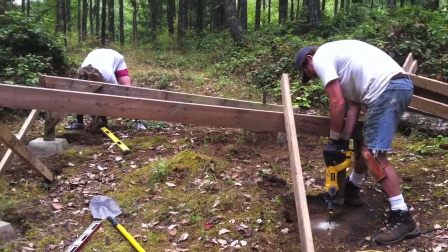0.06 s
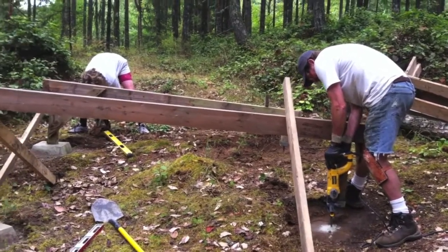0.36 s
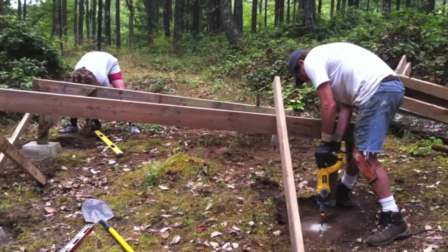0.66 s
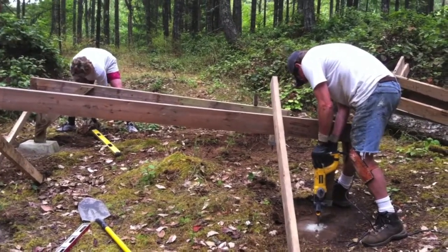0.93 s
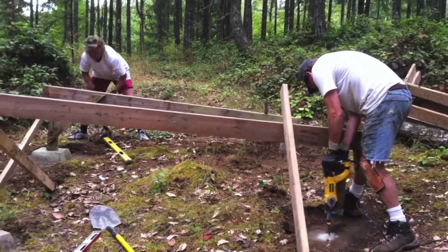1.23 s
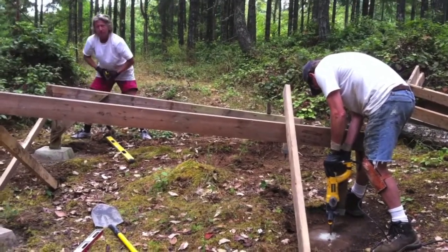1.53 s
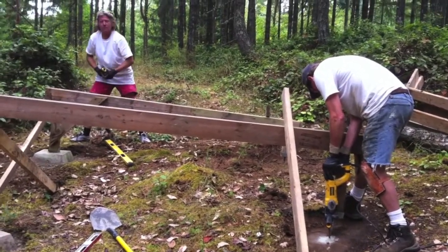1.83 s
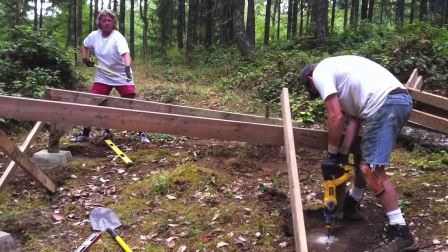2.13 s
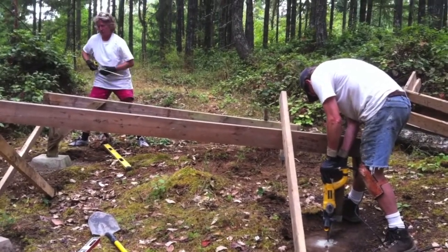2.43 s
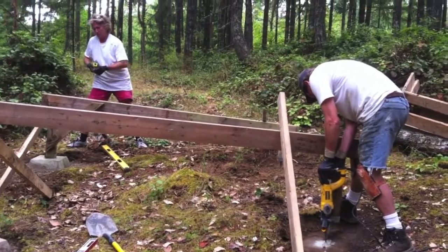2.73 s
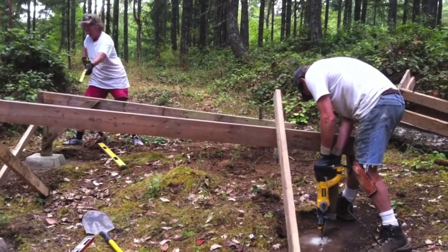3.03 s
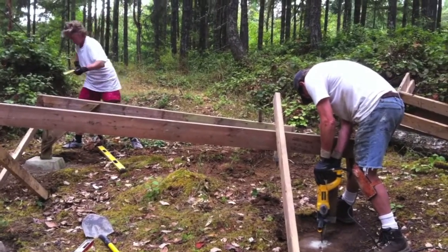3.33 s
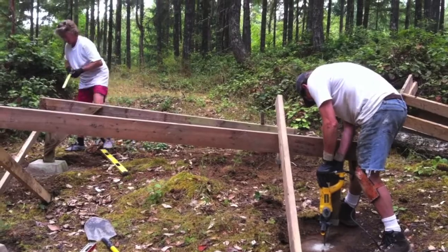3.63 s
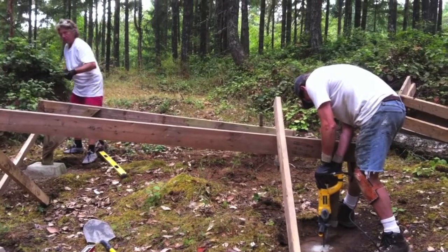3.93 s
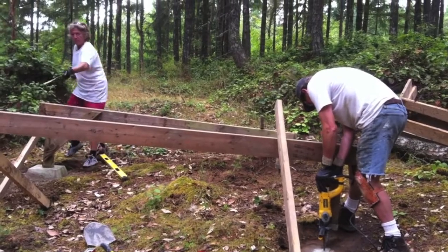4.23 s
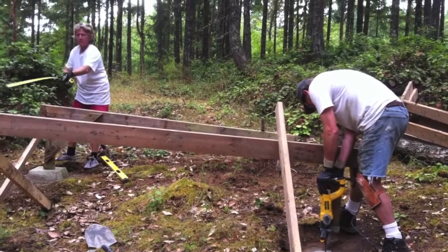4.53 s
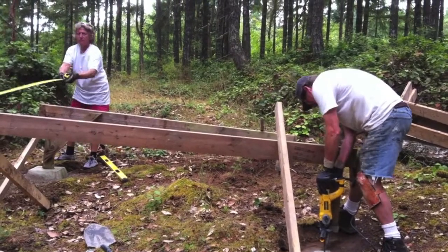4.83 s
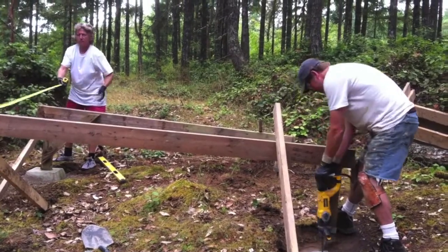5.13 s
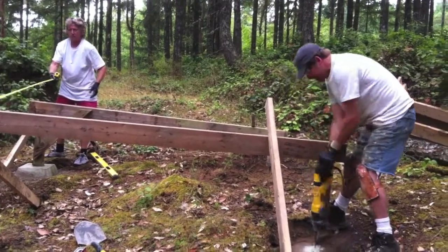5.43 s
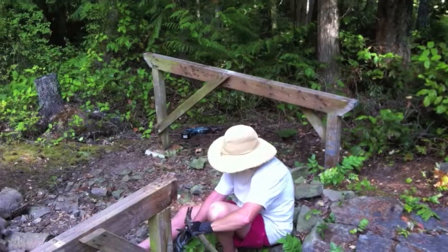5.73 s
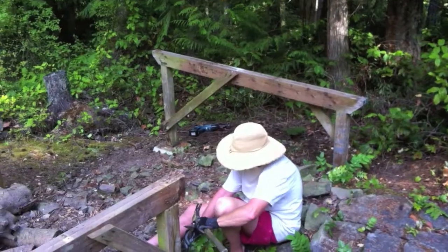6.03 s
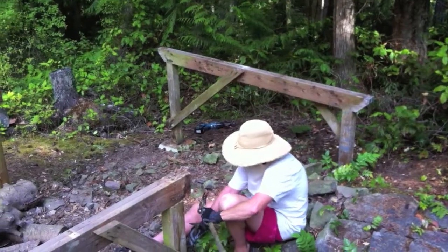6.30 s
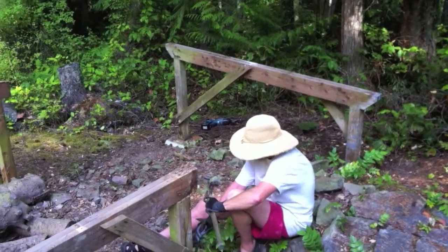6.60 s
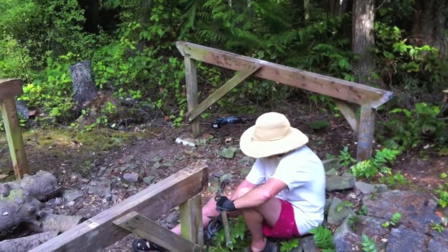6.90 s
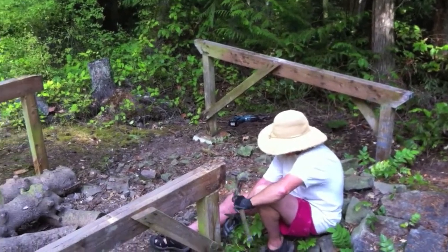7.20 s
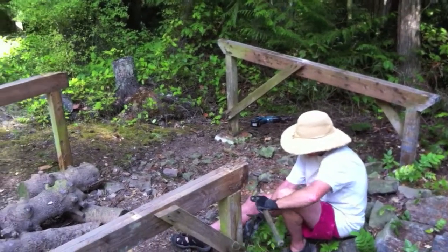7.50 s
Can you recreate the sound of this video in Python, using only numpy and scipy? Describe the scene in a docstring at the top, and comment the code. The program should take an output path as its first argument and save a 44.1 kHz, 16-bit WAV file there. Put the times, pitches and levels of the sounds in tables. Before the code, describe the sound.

Steady hammering and grinding of a drill in stone stops, followed by six louder, ringing hammer blows on a chisel.

```python
"""A cordless rotary hammer bores into bedrock in a forest clearing: periodic impacts excite its bit and
casing over whirring gears and grinding rock. It runs down and is pulled out, the bit scraping and
clacking in the hole. Then, at another spot, small stones shift and a hand hammer strikes a steel chisel
six times. Each blow excites damped modes of steel and rock, and the trees scatter the sound back."""
import sys
import numpy as np
from scipy import signal
from scipy.fft import rfft, irfft, next_fast_len
from scipy.io import wavfile
from scipy.ndimage import map_coordinates

SR = 44100
rng = np.random.default_rng(int(sys.argv[2]) if len(sys.argv) > 2 else 0)


def int16_out(signal):
    """Quantize to a 16-bit WAV file."""
    q = np.round(np.clip(np.atleast_2d(signal).T, -1, 1) * 32767)
    wavfile.write(sys.argv[1], SR, q.astype(np.int16))


N = 342216
T = np.arange(N) / SR
CHANGE_S, CHANGE_FADE_S = 5.603, 0.04  # the first scene has faded out and the second fades in


def amp(db):
    """Decibels to amplitude ratio."""
    return 10 ** (np.asarray(db) / 20)

def unit(x):
    """Normalisation to rms 1."""
    return x / np.sqrt(np.mean(x ** 2) + 1e-20)

def along(points, hz):
    """Interpolation on a logarithmic frequency axis."""
    f, v = np.transpose(points)
    return np.interp(np.log(hz + 1), np.log(f + 1), v)

def wobble(rate):
    """Smooth random modulation, rate knots a second."""
    return map_coordinates(rng.standard_normal(int(N * rate / SR) + 4), [T * rate])

def noise(spectrum, size=N):
    """Spectrally shaped noise of rms 1."""
    m = next_fast_len(size)
    gain = amp(along(spectrum, np.fft.rfftfreq(m, 1 / SR)))
    return unit(irfft(rfft(rng.standard_normal(m)) * gain, m)[:size])

def until(end, fade):
    """A linear fade from 1 that reaches 0 at the end."""
    return np.clip((end - T) / fade, 0, 1)

def add(track, s, sound):
    """Superposition of a sound at s seconds."""
    part = track[round(s * SR):][:len(sound)]
    part += sound[:len(part)]

def ring(modes, t, scatter_db):
    """Free vibration: damped modes of random phase and scattered strength."""
    return sum(amp(db + scatter_db * rng.normal() - 60 * t / t60)
               * np.sin(2 * np.pi * (hz * t + rng.random())) for hz, db, t60 in modes)

def burst(t, rise, hold, t60):
    """An envelope of linear rise, hold and exponential decay."""
    return np.clip(t / rise, 0, 1) * amp(-60 * np.maximum(t - hold, 0) / t60)


# Each row: frequency in Hz, relative spectral density in dB.
AIR_SPECTRUM = [(18, -24.5), (30, -9), (64, -20), (215, -2), (364, -11.5), (415, -7.5), (937, -9.5),
                (1220, -10), (1540, -15), (2230, -14.5), (3870, -19), (11700, -22.5), (16000, -26)]
def still_air():
    """Ambient noise: a faint, wavering floor under the second scene."""
    fade_in = 1 - until(CHANGE_S + CHANGE_FADE_S, CHANGE_FADE_S)
    return amp(-66 + 0.64 * wobble(12)) * noise(AIR_SPECTRUM) * fade_in


# Each row: frequency in Hz, reverberation time in seconds.
ECHO_T60 = [(200, 0.1), (1200, 0.83), (4000, 0.66), (5900, 0.77), (8500, 0.52), (14000, 0.28)]
# Each row: frequency in Hz, relative level of the echo in dB.
ECHO_COLOUR = [(150, 20.5), (700, -1.5), (1200, -8.5), (2500, -2.5), (6000, -2), (8500, -1), (11000, 0),
               (15000, -2.5)]
def forest(x):
    """Scattering: near trunks answer densely at once, far ones ever more faintly."""
    hz, t, z = signal.stft(rng.standard_normal(SR), SR, nperseg=256)
    decay = amp(along(ECHO_COLOUR, hz)[:, None] - 60 * t / along(ECHO_T60, hz)[:, None])
    onset = np.clip(t / 0.014, 0, 1) * (1 + 4 * np.exp(-t / 0.015))
    tail = signal.istft(z * decay * onset, SR, nperseg=256)[1]
    return signal.fftconvolve(x, tail / np.linalg.norm(tail))[:N]


# Hard contact, of stones or of steel. Each row: frequency in Hz, relative density in dB.
CRACK_SPECTRUM = [(1180, -31.5), (2000, -4.5), (2200, -17), (3230, -4), (3650, -12), (4410, -6.5),
                  (4820, -11), (5930, -7.5), (6940, -12), (7700, -8.5), (8400, -0.5), (11000, -14),
                  (12300, -16), (13300, -7.5), (16000, -25)]
# Each row: start in seconds, relative level in dB, pitch in Hz.
STONE_CLICKS = [(5.6274, -50, 3130), (5.644, -44.5, 1870), (5.667, -40.5, 1590), (5.69, -41, 1570),
                (5.709, -41, 8400), (5.8433, -48, 3960)]
def stones():
    """Collision: stones shift under the chisel, each with a click and a brief rough note."""
    out, t = np.zeros(N), np.arange(SR // 10) / SR
    for s, db, hz in STONE_CLICKS:
        envelope = burst(t, 0.0007, 0.00096, 0.014) + 0.26 * burst(t, 0.0027, 0.0069, 0.17)
        click = noise(CRACK_SPECTRUM, len(t)) * envelope
        band = [(hz / 2, -27), (hz, 0), (hz * 1.001, -4.5), (hz * 2, -27)]
        note = noise(band, len(t)) * burst(t, 0.0011, 0.001, 0.053)
        add(out, s, amp(db - 11.5) * (click + note))
    return out


# Modes of hammer head and chisel. Each row: frequency in Hz, relative level in dB, T60 in seconds.
STEEL_MODES = [(1344, -3, 0.14), (2730, -0.5, 0.088), (3352, -4.5, 0.066), (4470, 6, 0.11),
               (5805, -6.5, 0.35), (6030, -3, 0.28), (8000, 3, .08), (8300, -12, .09), (8100, -14, .08)]
# Modes of the rock. Each row: frequency in Hz, relative level in dB, T60 in seconds.
ROCK_MODES = [(279, -16, 0.139), (339, -13.5, 0.12), (437, -10, 0.0911), (532, -6, 0.083), (580, -3, 0.047),
              (745, -3.5, 0.11), (850, -10, 0.12), (990, -17.5, .08)]
# Crushing rock. Each row: frequency in Hz, relative density in dB.
THUD_SPECTRUM = [(40, -29.5), (120, -29), (290, -7), (450, -13.5), (780, 1), (1020, 1), (1300, -2),
                 (1650, 0), (1850, -22), (2400, -12.5), (5000, -55.5)]
# Each row: time in seconds, gain in dB, knock pitch in Hz, then knock, thud and crack gains in dB.
CHISEL_BLOWS = [(5.897, -4, 1212, -10, -14, -13), (6.193, -1.5, 1223, -16, -16, -14),
                (6.469, -1.5, 1180, -15.5, -16, -14), (6.786, -3, 1195, -15.5, -14.5, -11.5),
                (7.102, -1.5, 1601, -16, -15, -13.5), (7.403, -2, 1640, -13, -13.5, -12.5)]
def hammer_and_chisel():
    """Impact excitation: steel cracks on steel, the rock thuds and the tools ring on."""
    out, t = np.zeros(N), np.arange(SR * 3 // 4) / SR
    ring_db, loss_db = -27, 1.4  # with each blow the chisel bites deeper and rings less
    crack_shape = burst(t, 0.0016, 0.0068, 0.025) + 0.1055 * burst(t, 0.0093, 0.012, 0.091)
    crush_shape = burst(t, 0.0065, 0.0086, 0.038) + 0.1 * burst(t, 0.012, 0.015, 0.175)
    seating = amp(-25 * np.clip(1 - t / 0.002214, 0, 1))  # contact force builds as the chisel seats
    for struck, (s, db, knock_hz, knock_db, thud_db, crack_db) in enumerate(CHISEL_BLOWS):
        crack = amp(crack_db) * noise(CRACK_SPECTRUM, len(t)) * crack_shape
        crush = noise(THUD_SPECTRUM, len(t)) * crush_shape
        rock = ring(ROCK_MODES, t, scatter_db=0.5) * np.clip(t / 0.004, 0, 1)
        thud = amp(thud_db - 1.4) * (crush + 0.5 * rock)
        knock = amp(knock_db + 2) * np.sin(2 * np.pi * knock_hz * t) * burst(t, 0.0043, 0.0045, 0.052)
        steel = amp(ring_db - loss_db * struck) * ring(STEEL_MODES, t, scatter_db=2)
        add(out, s - 0.0015, amp(db) * seating * (crack + thud + knock + steel))
    return out


# Tugs on the bit. Each row: start in seconds, length in seconds, level in dB.
BIT_TUGS = [(5.219, 0.02, -46.5), (5.275, 0.049, -44), (5.404, 0.032, -37.5), (5.442, 0.077, -40.5),
            (5.529, 0.037, -53)]
# Each row: start in seconds, level in dB.
SOIL_SPILLS = [(5.311, -50), (5.37, -55), (5.41, -60)]
# Scraped rock and falling soil. Each row: frequency in Hz, relative density in dB.
SCRAPE_SPECTRUM = [(300, -41), (680, -6), (850, -13), (1450, -1.5), (1850, -2), (2200, 1.5), (2700, -6),
                   (3500, -9), (4400, -8), (6500, -4.5), (8100, -15.5), (11700, -2), (13300, -22),
                   (15200, -8), (16400, -34)]
SOIL_SPECTRUM = [(40, -26), (90, -17), (150, 2), (300, -7), (450, -8), (750, 1), (1100, -3), (2000, -52)]
def withdrawal():
    """Sliding friction: the flutes scrape up the gritty wall, and loose soil drops back."""
    sag_db_per_s = 45
    tugs = sum(amp(db - sag_db_per_s * np.maximum(T - s, 0)) * burst(T - s, 0.011, length, 0.083)
               for s, length, db in BIT_TUGS)
    spills = sum(amp(db) * burst(T - s, 0.0077, 0.0077, 0.31) for s, db in SOIL_SPILLS)
    grain = unit(amp(2.3 * wobble(520) + 1.7 * wobble(120)))
    scrape = tugs * grain * noise(SCRAPE_SPECTRUM)
    return (scrape + spills * noise(SOIL_SPECTRUM)) * until(CHANGE_S, CHANGE_FADE_S)


# Each row: start in seconds, relative level in dB.
RIM_CLACKS = [(5.3194, -32.5), (5.352, -22), (5.388, -21.5), (5.4108, -23)]
# Each row: frequency in Hz, relative density in dB.
CLACK_SPECTRUM = [(150, -45), (600, -20.5), (2100, -11.5), (3900, -20.5), (5000, -6), (5900, -4),
                  (7100, -14), (8700, -13), (9400, -11), (10600, -2.5), (12600, -22), (16000, -14.5),
                  (16500, -54.5)]
def clacks():
    """Brief contact, broad spectrum: the bit knocks on the rim of the hole on its way out."""
    out, t = np.zeros(N), np.arange(SR // 16) / SR
    envelope = burst(t, 0.00045, 0.00081, 0.017) + 0.095 * burst(t, 0.00126, 0.0022, 0.057)
    for s, db in RIM_CLACKS:
        add(out, s, amp(db - 5.5) * noise(CLACK_SPECTRUM, len(t)) * envelope)
    return out


USUAL_BITE_DB, STRIKE_HZ = -38.5, 57.68  # the usual load and the strike rate under it
RELEASE_S, STRIKER_STOP_S = 4.92, 5.16  # trigger let go; motor too slow to throw the striker
# The bite builds, then slips as the rock gives way. Each row: time in seconds, level in dB.
BITE_LEVELS = [(0.0, -39), (0.72, -36), (1.22, -36), (1.24, -39), (2.21, -37), (2.24, -42), (2.28, -41),
               (2.87, -38), (2.96, -40), (3.41, -38), (4.66, -39), (4.88, -40)]
def bite():
    """Mechanical load: how hard the bit bites, in dB at each sample."""
    return np.interp(T, *np.transpose(BITE_LEVELS))

def motor():
    """Load slows a motor; once released, it coasts down and fades."""
    sag_hz_per_db, coast_hz_per_s, coast_db_per_s, idle_db = 0.5, 32, 22, -5
    coasting = np.maximum(T - RELEASE_S, 0)
    striking = until(STRIKER_STOP_S, 0.023)
    rate = STRIKE_HZ - sag_hz_per_db * (bite() - USUAL_BITE_DB) - coast_hz_per_s * coasting
    level_db = bite() - coast_db_per_s * coasting + idle_db * (1 - striking)
    return level_db, np.maximum(rate, 1), striking


# Each row: frequency in Hz, relative density in dB.
GROUND_SPECTRUM = [(30, -27), (80, -15), (130, -4), (200, 0), (230, -3.5), (290, -9), (400, 2), (480, -1.5),
                   (600, -31), (1000, -78)]
def ground_rumble():
    """Forced vibration: the ground rumbles more as the bite hardens."""
    return amp(-74.5 + 0.61 * (bite() - USUAL_BITE_DB) + 3.2 * wobble(7.2)) * noise(GROUND_SPECTRUM)


def chips():
    """Damped oscillation: rock chips catch between bit and hole and clink."""
    out, t = np.zeros(N), np.arange(SR // 16) / SR
    level_db = motor()[0]
    for when, pitch, size in rng.random((70, 3)):
        s = 5.1 * when
        clink = np.sin(2 * np.pi * 1100 * 2.6 ** pitch * t) * burst(t, 0.0027, 0.0051, 0.058)
        add(out, s, amp(level_db[round(s * SR)] - 6 + 7.1 * size ** 2) * clink)
    return out


# Each row: frequency in Hz, relative density in dB.
TICK_SPECTRUM = [(100, -56), (500, -12), (2500, -21.5), (5500, -9), (8000, -18), (10500, 2.5), (12400, 3),
                 (13200, -1.5), (14500, 2.5), (15900, -3.5), (16400, -43)]
def striker_ticks(blow, since, scatter):
    """Impact and rebound: the bit bounces, so strong and weak blows tend to alternate."""
    force = amp(2.2 * np.tanh(scatter) + 1.2 * (-1) ** blow)
    envelope = burst(since, 0.00025, 0.0011, 0.0029) + 0.13 * burst(since, 0.001, 0.001, 0.055)
    seated_s = 1.75  # ticks are weaker until the bit has seated
    return amp(-43 - 6.5 * until(seated_s, seated_s)) * unit(force * envelope) * noise(TICK_SPECTRUM)


# The bit in a shallow and in a deep hole. Each row: frequency in Hz, relative density in dB.
SHALLOW_SPECTRUM = [(1760, -20), (3000, -4.5), (3330, -8), (3890, 4), (4410, 0.5), (5000, 5), (5840, 0.5),
                    (6300, 5), (7460, -11), (8700, 2), (9460, -3.5), (10400, 0.5), (13100, -13), (15100, 2),
                    (16000, -8)]
DEEP_SPECTRUM = [(1760, -41), (3000, -4), (3450, -8.5), (3910, 1), (4470, -2.5), (4930, 2.5), (5800, 1),
                 (6300, 4.5), (8000, -11), (10100, 0.5), (10800, 1), (12200, -3.5), (13300, -25),
                 (15100, 1), (16000, -9)]
def grinding(drive):
    """Abrasion excites the resonances of the bit, which change as it sinks."""
    depth = np.clip((T - 1.2) / 1.83, 0, 1)
    grit = np.sqrt(1 - depth) * noise(SHALLOW_SPECTRUM) + np.sqrt(depth) * noise(DEEP_SPECTRUM)
    return grit * unit(np.sqrt(drive) * amp(2.57 * wobble(900)))


# Each row: multiple of the strike rate, relative level in dB.
GEAR_ORDERS = [(3, -39.5), (4, -33.5), (8, -33.5), (9, -34), (11, -18.5), (12, -23), (20, -18.5), (24, -11),
               (28, -7.5), (36, -12)]
def gear_whine(turns):
    """Periodic tooth contact gives harmonics of the crank rate."""
    tones = sum(amp(db + 1.95 * wobble(9)) * np.sin(2 * np.pi * order * turns + 0.76 * wobble(30))
                for order, db in GEAR_ORDERS)
    return tones * until(STRIKER_STOP_S, 0.15)


def recoil_drive(since, scatter, striking):
    """Amplitude modulation: the housing answers 3 ms after each blow, then the piston returns."""
    impact = 0.38 * burst(since, 0.00048, 0.0016, 0.028)
    housing = burst(since - 0.0028, 0.00033, 0.0011, 0.021)
    piston = 0.5 * burst(since - 0.0088, 0.00048, 0.0016, 0.053)
    recoil = unit((impact + housing + piston) * amp(1.4 * scatter))
    in_step = 0.21 * striking + 0.14 * (1 - striking)  # share of the power that follows the crank
    return np.sqrt(1 - in_step + in_step * recoil ** 2)


# The gearbox casing. Each row: frequency in Hz, relative density in dB.
CASING_SPECTRUM = [(80, -62), (400, -37), (585, -18), (650, -4), (720, -6), (790, -15.5), (960, -11),
                   (1100, -1.5), (1650, -0.5), (2130, -0.5), (2400, -4), (2850, -3.5), (3400, -13.5),
                   (9000, -49)]
def casing_ring(blow, scatter):
    """Impulse response: every blow rings the same dense casing modes."""
    t = np.arange(SR // 20) / SR
    response = noise(CASING_SPECTRUM, len(t)) * burst(t - 0.002, 0.00044, 0.00086, 0.059)
    impulses = np.diff(blow, prepend=0) * amp(2.65 * scatter)
    return unit(signal.fftconvolve(impulses, response)[:N])

def drill():
    """Periodic forcing: the striker hits the bit once a crank turn, and the housing rattles."""
    level_db, rate, striking = motor()
    turns = np.cumsum(rate * (1 + 0.0031 * wobble(25))) / SR
    blow, since = turns.astype(int), turns % 1 / rate  # blow number, seconds since that blow
    tick_scatter, body_scatter = rng.standard_normal((600, 2))[blow].T
    drive = recoil_drive(since, body_scatter, striking)
    pings = casing_ring(blow, body_scatter) * striking
    # the cutting edges catch on the rock as the bit turns
    catch = amp(1.66 * np.sin(2 * np.pi * 0.47 * turns + 0.72 * wobble(5)) + 0.61 * wobble(30))
    whine = gear_whine(turns)
    rattle = 0.89 * noise(CASING_SPECTRUM) * drive + 0.45 * pings
    gearbox = amp(level_db - 3.5) * (catch * rattle + whine)
    grit = amp(level_db - 1.33) * catch * grinding(drive)
    ticks = striker_ticks(blow, since, tick_scatter) * striking
    # so small a body radiates almost no bass
    low_cut = signal.butter(2, 150, "high", fs=SR, output="sos")
    radiated = signal.sosfilt(low_cut, gearbox + grit + ticks)
    return (radiated + ground_rumble()) * until(5.3, 0.054)


def scene():
    """Superposition: the drill, then the hammer among the trees over still air."""
    blows = hammer_and_chisel() + stones()
    air = still_air()
    drilling = drill() + chips() + withdrawal() + clacks()
    return (drilling + blows + amp(-16) * forest(blows) + air)[None]

def record(dry):
    """Soft saturation rounds the highest peaks; a band limit removes the top treble."""
    ceiling, top_hz, edge_hz = 0.65, 16250, 400
    rounded = dry / (1 + (dry / ceiling) ** 4) ** 0.25
    m = next_fast_len(N + 8192)
    passband = np.clip((top_hz - np.fft.rfftfreq(m, 1 / SR)) / edge_hz, 0, 1)
    return irfft(rfft(rounded, m) * passband, m)[..., :N]


dry = scene()
out = record(dry)
int16_out(out)
```